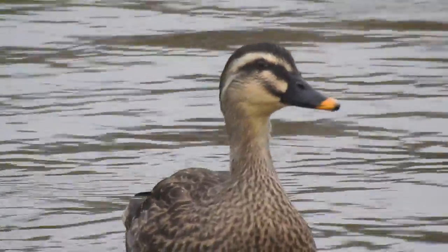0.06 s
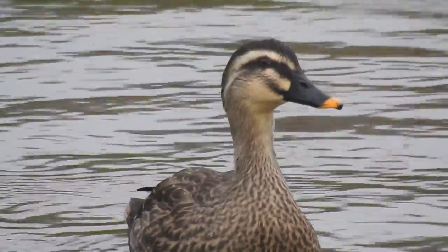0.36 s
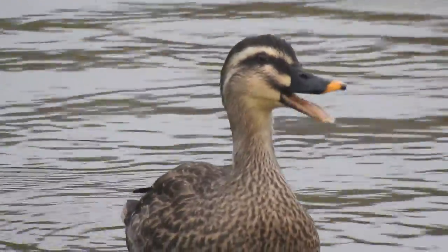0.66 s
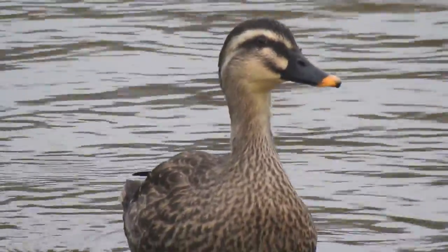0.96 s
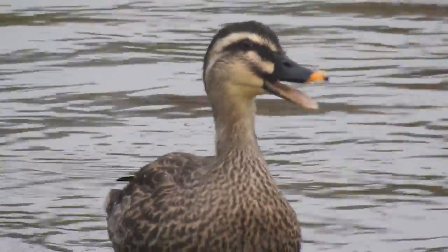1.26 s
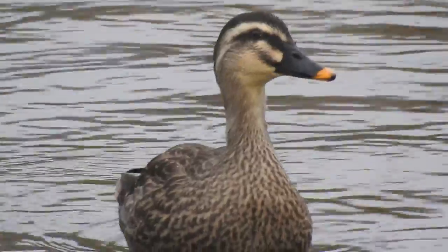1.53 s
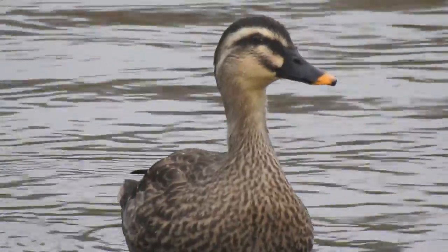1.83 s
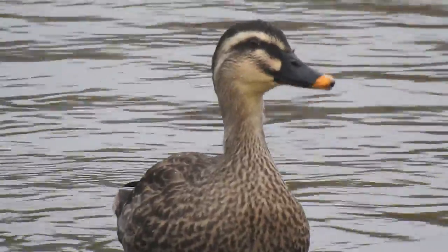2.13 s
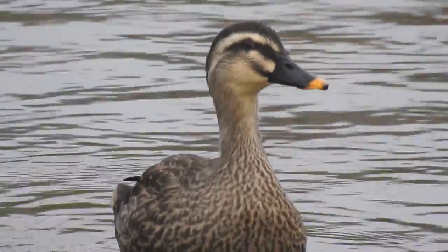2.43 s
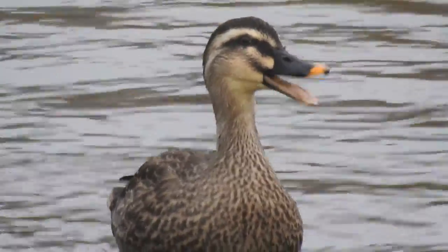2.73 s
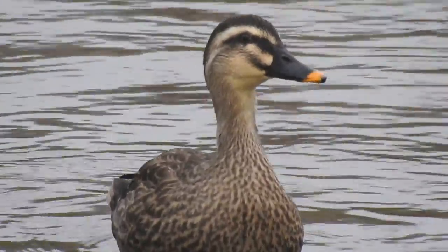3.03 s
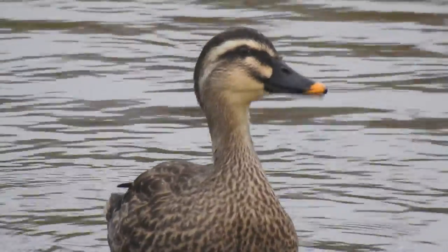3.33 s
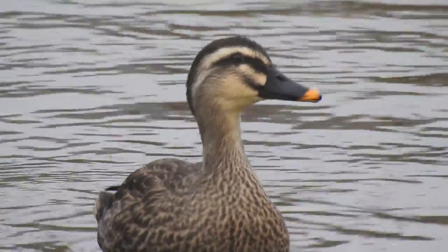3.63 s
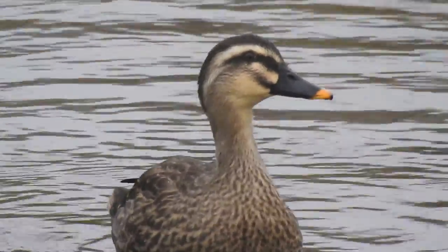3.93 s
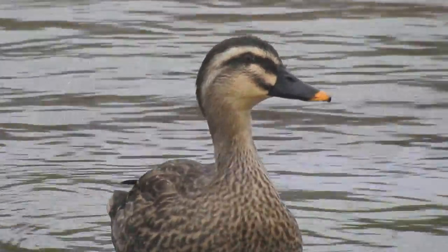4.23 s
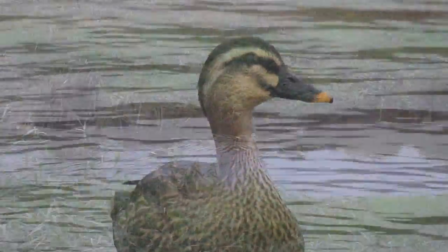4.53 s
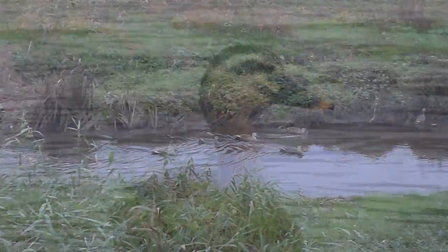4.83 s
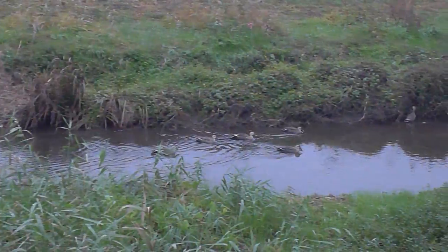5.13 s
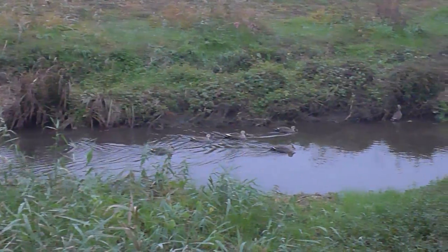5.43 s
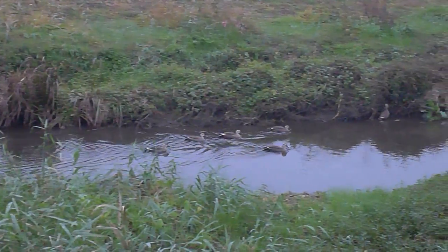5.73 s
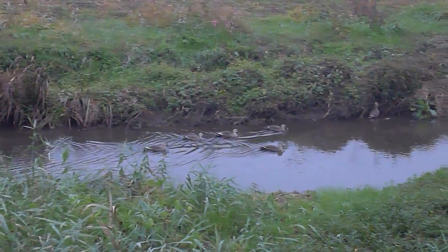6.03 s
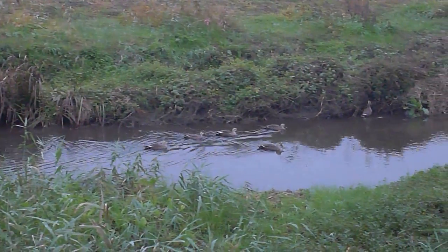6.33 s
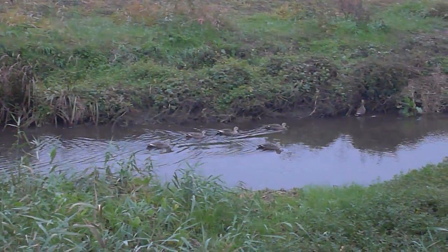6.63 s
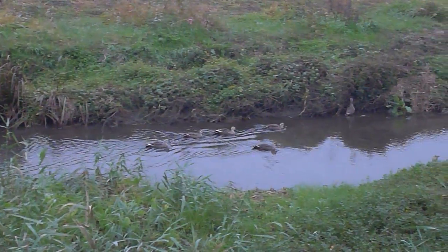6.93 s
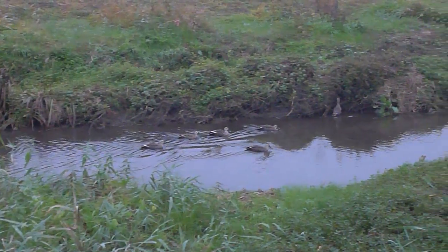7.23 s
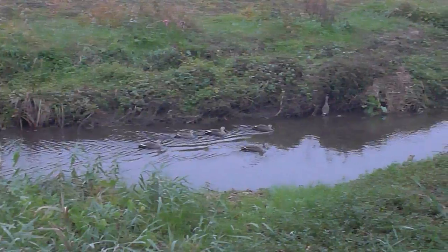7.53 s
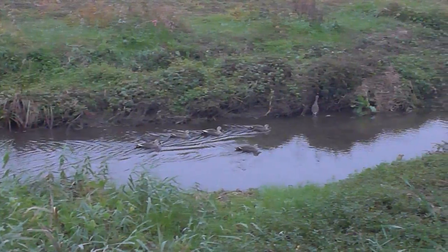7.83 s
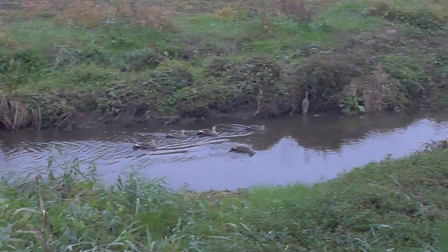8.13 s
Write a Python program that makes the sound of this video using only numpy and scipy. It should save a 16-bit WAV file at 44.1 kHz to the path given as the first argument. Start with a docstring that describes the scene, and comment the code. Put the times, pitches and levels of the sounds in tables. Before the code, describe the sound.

A duck on a river gives six loud, raspy quacks at an even pace, fairly close and straight ahead. Water washes softly over a low distant rumble, while a wagtail adds thin, high chips from the left. After the last quack a few drops fall, and the sound fades to a quieter spot up the bank, with one faint hoot, a small bird's rapid chatter and a far road swelling slightly.

```python
"""Over the wash of a river and a low distant rumble, a duck gives six evenly spaced quacks:
membranes in its voice box slap shut and make its throat and bill ring. Meanwhile a wagtail throws
in thin arched chips, and other birds whistle farther off. After the last quack a few drops fall, and
the scene fades into a quieter, single-channel spot up the bank. There a small bird chatters about
twelve notes a second, something hoots once, and a far road swells."""
import sys
import numpy as np
from scipy import signal
from scipy.fft import rfft, irfft, next_fast_len
from scipy.io import wavfile
from scipy.ndimage import uniform_filter1d

SR = 44100
rng = np.random.default_rng(int(sys.argv[2]) if len(sys.argv) > 2 else 0)


def master_out(mix):
    """Clip the mix to full scale and print it as 16-bit PCM to the path in sys.argv[1]."""
    frames = np.transpose(np.atleast_2d(mix))
    ceiling = np.clip(frames, -1, 1)
    pcm = np.round(ceiling * 32767).astype(np.int16)
    wavfile.write(sys.argv[1], SR, pcm)


N = 360297
TIME = np.arange(N) / SR


def gain_of(db):
    """Turns decibels into a number to multiply a sound by."""
    return 10 ** (np.asarray(db) / 20)


def unit_level(x):
    """Scales a signal so that its average power is 1."""
    return x / np.sqrt(np.mean(np.abs(x) ** 2) + 1e-20)


def at_frequency(points, hz):
    """Reads between the rows of a table, with frequency spaced in octaves."""
    row_hz, value = np.transpose(points)
    return np.interp(np.log(hz + 1), np.log(row_hz + 1), value)


def wander(n, rate_hz):
    """A smooth random wobble that moves up to about rate_hz."""
    size = next_fast_len(n + SR // 10)
    hz = np.fft.rfftfreq(size, 1 / SR)
    return unit_level(irfft(rfft(rng.standard_normal(size)) * np.exp(-(hz / rate_hz) ** 2)))[:n]


def keep_band(x, hz, kind, order=2):
    """Keeps what lies above ("high") or below ("low") hz."""
    return signal.sosfilt(signal.butter(order, hz, kind, fs=SR, output="sos"), x)


def play(source, rows):
    """One track with a sound for each row; anything before time zero is dropped."""
    track = np.zeros(N)
    for row in rows:
        start_s, sound = source(*row)
        start = round(start_s * SR)
        sound = sound[max(-start, 0):]
        part = track[max(start, 0):][:len(sound)]
        part += sound[:len(part)]
    return track


# how alike the left and right noise are: frequency_hz, likeness (1 = the same)
STEREO_LIKENESS = [(60, 0.87), (300, 0.95), (1700, 0.82), (6000, 0.61), (12000, 0.41)]
# how far the left is ahead: frequency_hz, lead_radians
LEFT_LEAD = [(100, 0), (700, 0.04), (1700, 0.28), (6000, 1.3), (12000, 1.35)]
# how much louder the left is: frequency_hz, boost_db
LEFT_BOOST = [(100, 0), (500, -0.5), (1700, 4), (6000, 2), (12000, 0)]

def wash(spectrum, patchy_db):
    """Stereo noise of power about 1, shaped by a spectrum, with drifting louder and softer patches."""
    hz = np.fft.rfftfreq(2048, 1 / SR)
    a, b, c, d, patches = rng.standard_normal((5, len(hz), N // 512 + 5))
    shared, separate = a + 1j * b, c + 1j * d
    patches = unit_level(uniform_filter1d(uniform_filter1d(patches, size=14, axis=0), size=8, axis=1))
    alike = np.clip(at_frequency(STEREO_LIKENESS, hz), -1, 1)[:, None]
    lean = gain_of(at_frequency(LEFT_BOOST, hz) / 2) * np.exp(.5j * at_frequency(LEFT_LEAD, hz))
    left = shared * lean[:, None]
    right = (alike * shared + np.sqrt(1 - alike ** 2) * separate) / lean[:, None]
    shape = gain_of(at_frequency(spectrum, hz)[:, None] + patchy_db * patches)
    noise = signal.istft(np.array([left, right]) * shape, nperseg=2048, noverlap=1536)[1][:, :N]
    return noise / noise.mean(0).std()


# the rumble's tone: frequency_hz, relative_db
RUMBLE_SPECTRUM = [(20, -38), (35, -36), (50, -13.5), (72, 2.5), (105, -11.5), (140, -29), (300, -53)]
# its loudness: time_s, level_db
RUMBLE_LOUDNESS = [(0, -50), (1.1, -53), (1.9, -48.5), (2.45, -59.5), (3, -53), (3.3, -48), (3.9, -48.5),
                   (4.6, -48)]

def rumble():
    """Deep, distant noise that swells and sinks."""
    return gain_of(np.interp(TIME, *np.transpose(RUMBLE_LOUDNESS))) * wash(RUMBLE_SPECTRUM, patchy_db=1.5)


# the drone's tone: frequency_hz, relative_db
DRONE_SPECTRUM = [(80, -38), (140, -14.5), (195, 1.5), (280, 0), (340, -13.5), (450, -11.5), (900, -56)]

def drone(level_db=-50):
    """A steady low noise just above the rumble."""
    return gain_of(level_db) * wash(DRONE_SPECTRUM, patchy_db=3.5)


# the water's tone: frequency_hz, relative_db
RIVER_SPECTRUM = [(190, 0.5), (330, -1.5), (470, -6), (609, -2), (692, -6.5), (1100, -2.5), (1400, -7),
                  (1600, -11), (2140, -9), (2590, -9.5), (4340, -7.5), (5100, -6.5), (6390, -1.5),
                  (8130, -17.5), (15500, -35.5)]

def river(level_db=-47.5):
    """Water washing along the river's edge."""
    return gain_of(level_db) * wash(RIVER_SPECTRUM, patchy_db=2.5)


# the tone of the air up the bank: frequency_hz, relative_db
HUSH_SPECTRUM = [(20, -18.5), (45, 1), (90, 1), (150, -7), (400, -8.5), (900, -14.5), (1300, -13.5),
                 (1800, -11.5), (2400, -16), (4800, -15.5), (5800, -17), (6900, -27), (7700, -42.5),
                 (9000, -70)]

def hush(level_db=-51):
    """The even hush of open air."""
    return gain_of(level_db) * wash(HUSH_SPECTRUM, patchy_db=.3)


# the road's tone: frequency_hz, relative_db
ROAD_SPECTRUM = [(300, -11), (600, -0.5), (700, 5), (790, -1), (920, 6.5), (1130, -0.5), (1400, -7.5),
                 (2500, -54.5)]
# its swell: time_s, relative_db
ROAD_SWELL = [(5, -55), (5.4, -51), (6.2, -52), (6.8, -49), (7.35, -46), (7.7, -50), (8.17, -51)]

def road(trim_db=-4):
    """The noise of a far road grows, then eases."""
    level_db = np.interp(TIME, *np.transpose(ROAD_SWELL)) + trim_db
    return gain_of(level_db) * wash(ROAD_SPECTRUM, patchy_db=.5)


def bank_echo(x, decay_s, echo_db):
    """Reeds and banks scatter a faint tail, different on each side, that falls 60 dB in decay_s."""
    t = np.arange(SR // 2) / SR
    echoes = rng.standard_normal((2, len(t))) * (rng.random((2, len(t))) < .05)
    echoes *= gain_of(-60 * t / decay_s) * (t > .004)
    echoes /= np.linalg.norm(echoes[0])
    return gain_of(echo_db) * signal.fftconvolve(x[None], echoes, axes=1)[:, :N]


def ripple_echo(x, echo_db=-6.5):
    """Rippled water scatters the treble within a few milliseconds, differently to each side."""
    t = np.arange(SR // 80) / SR
    echoes = rng.standard_normal((2, len(t))) * np.exp(-t / .003)
    echoes /= np.linalg.norm(echoes, axis=1, keepdims=True)
    treble = keep_band(x, 4200, "high")
    return gain_of(echo_db) * signal.fftconvolve(treble[None], echoes, axes=1)[:, :N]


def with_close_echo(x, echo_db=-16, delay_s=.00138):
    """A surface beside the microphone adds one quick echo that colours the sound."""
    return x + gain_of(echo_db) * np.roll(x, round(delay_s * SR), axis=-1)


# a faint low hoot: start_s, level_db, lowest_hz, length_s
HOOTS = [(4.85, -45.5, 192.8, 0.17)]

def hoot(start_s, level_db, lowest_hz, length_s, sag=.14):
    """A soft, plain tone that sags and rises again."""
    along = np.linspace(-1, 1, int(length_s * SR))
    tone = np.sin(2 * np.pi * np.cumsum(lowest_hz * (1 + sag * along ** 2)) / SR)
    return start_s, gain_of(level_db) * tone * signal.windows.tukey(len(along), .4)


# drops and plops on the water: start_s, level_db, pitch_hz
WATER_DROPS = [(4.047, -28, 8930), (4.082, -48, 8850), (4.565, -45, 622)]

def drip(start_s, level_db, pitch_hz, tick_db=-15):
    """A tick and a ringing bubble; large bubbles ring lower and longer."""
    t = np.arange(SR // 8) / SR
    tick = gain_of(tick_db) * rng.standard_normal(len(t)) * np.exp(-t / .00052)
    ring_s = 3.4 / np.sqrt(pitch_hz)
    bubble = np.sin(2 * np.pi * pitch_hz * t) * gain_of(-60 * t / ring_s)
    return start_s, gain_of(level_db) * (tick + bubble)


# birds farther off: start_s, level_db, first_hz, last_hz, length_s
FAR_WHISTLES = [(1.776, -62, 9700, 8360, 0.27), (1.965, -51, 5020, 3020, 0.057),
                (2.194, -50, 3670, 3660, 0.17), (3.94, -45.5, 5270, 5280, .025),
                (3.959, -45, 4730, 4420, 0.026), (3.987, -46.5, 3700, 4320, 0.02),
                (4.016, -51.5, 2490, 2830, 0.015)]

def whistle(start_s, level_db, first_hz, last_hz, length_s, waver=.03, flicker_db=4):
    """A thin, ragged whistle that slides from one pitch to another."""
    n = int(length_s * SR)
    hz = np.linspace(first_hz, last_hz, n) * (1 + waver * wander(n, 400))
    tone = np.sin(2 * np.pi * np.cumsum(hz) / SR) * gain_of(flicker_db * wander(n, 120))
    return start_s, gain_of(level_db) * unit_level(tone * signal.windows.tukey(n, .6))


# tumbling bird phrases: start_s, length_s, level_db, first_hz, last_hz
WARBLE_PHRASES = [(0.199, .2, -58.5, 4470, 3200), (2.259, 0.084, -52.5, 3120, 2550)]

def warble(start_s, length_s, level_db, first_hz, last_hz, scatter=.15, note_s=.023, notes_per_s=71):
    """Tiny whistles tumble loosely down from the first pitch to the last."""
    along = np.linspace(0, 1, round(length_s * notes_per_s))
    starts_s = start_s + length_s * along - note_s / 2
    path_hz = first_hz + (last_hz - first_hz) * along
    ends_hz = path_hz[:, None] * (1 + scatter * rng.standard_normal((len(along), 2)))
    return play(whistle, [(s, level_db, *hz, note_s) for s, hz in zip(starts_s, ends_hz)])


# plain low pips among the chatter: start_s, level_db, pitch_hz
LOW_PIPS = [(5.02, -61.5, 3360), (6.298, -51, 3350), (7.666, -54, 3300)]

def pip(start_s, level_db, pitch_hz, rise=.043, length_s=.024):
    """A short whistle that rises slightly."""
    return whistle(start_s, level_db, pitch_hz * (1 - rise), pitch_hz * (1 + rise), length_s)


# the tones stacked in a chatter note: multiple_of_base_pitch, relative_db
CHATTER_TONES = [(2, -1.5), (3, 7.5), (4, -9.5)]
# how the voice changes: time_s, strongest_tone_hz, lowest_tone_boost_db
CHATTER_VOICE = [(4.6, 4755, -4), (6.3, 4910, -0.5), (6.4, 5195, 6), (6.9, 5130, -1), (7.3, 4960, -0.5),
                 (7.7, 4960, 6)]
# its loudness, which falters twice: time_s, level_db
CHATTER_LOUDNESS = [(4.63, -56), (5.12, -46.5), (5.8, -48), (6.22, -44), (6.3, -51.5), (6.37, -45.5),
                    (6.85, -45), (7.43, -47.3), (7.55, -54.5), (7.67, -50.5), (8.1, -47.5)]

def chatter_note(start_s, length_s=.03, sweeps_per_s=150, arch=.097, drop=.34, scratch=.055):
    """A buzzy note: four or five quick downward sweeps riding on a small arch."""
    n = int(length_s * SR)
    t = np.arange(n) / SR
    times_s, *columns = np.transpose(CHATTER_VOICE)
    strongest_hz, boost_db = (np.interp(start_s, times_s, column) for column in columns)
    level_db = np.interp(start_s, *np.transpose(CHATTER_LOUDNESS)) + .16 * rng.standard_normal()
    sweep = sweeps_per_s * (1 + .09 * rng.standard_normal()) * t % 1
    fall = drop * (.5 - sweep) + scratch * wander(n, 1000) + .015 * rng.standard_normal()
    hz = strongest_hz * (1 + fall + arch * (np.sin(np.pi * t / length_s) - 2 / np.pi))
    base_cycles = np.cumsum(hz) / SR / 3  # the strongest tone is 3 times the base pitch
    note = np.zeros(n)
    for multiple, db in CHATTER_TONES:
        tone_db = db + boost_db * (multiple == 2) + 1.3 * wander(n, 220)
        note += gain_of(tone_db) * np.sin(2 * np.pi * multiple * base_cycles)
    fades = np.sqrt(np.sin(np.pi * sweep)) * signal.windows.tukey(n, .25)
    return start_s, gain_of(level_db) * unit_level(note * fades)


# runs of chatter: first_note_s, last_note_s, note_count
NOTE_RUNS = [(4.627, 6.148, 19), (6.222, 6.529, 5), (6.616, 7.426, 11), (7.508, 7.903, 6),
             (7.998, 8.155, 3)]

def chatter():
    """A small bird sings run after run, each at its own even pace, with a few pips among them."""
    notes = [(s,) for first_s, last_s, count in NOTE_RUNS for s in np.linspace(first_s, last_s, count)]
    return play(chatter_note, notes) + play(pip, LOW_PIPS)


# the wagtail's calls: middle_s, level_db, top_hz, length_s
WAGTAIL_CHIPS = [(0.518, -47, 6200, 0.027), (0.892, -31.5, 6250, 0.046), (0.991, -32, 6060, 0.05),
                 (1.682, -37.5, 5880, 0.01), (1.955, -31, 6250, 0.047), (2.044, -32, 6080, 0.051),
                 (3.382, -35, 6330, 0.041), (3.472, -36, 5850, 0.033), (4.32, -38, 6370, 0.046),
                 (4.406, -41.5, 6200, 0.056), (4.51, -40, 6000, 0.057)]

def chip(middle_s, level_db, top_hz, length_s, arch=.27, fall=.051, buzz_hz=720, buzz=.38):
    """A whistle that arches up and falls further, made buzzy by a fast flutter."""
    n = int(length_s * SR)
    along = np.linspace(-1, 1, n)
    hz = top_hz * (1 - arch * along ** 2 - fall * along + .025 * wander(n, 350))
    flutter = np.sin(2 * np.pi * np.cumsum(buzz_hz * (1 + .112 * wander(n, 220))) / SR)
    tone = np.sin(2 * np.pi * np.cumsum(hz) / SR + buzz * flutter) * (1 + buzz * flutter)
    return middle_s - length_s / 2, gain_of(level_db) * unit_level(tone) * signal.windows.tukey(n, .8)


def resonate(x, hz, width_hz):
    """Rings like a hollow space: keeps a narrow band around hz, which may move over time."""
    spin = np.exp(2j * np.pi * np.cumsum(hz * np.ones(len(x))) / SR)
    decay = np.exp(-np.pi * width_hz / SR)
    band = signal.lfilter([(1 - decay) ** 2], [1, -2 * decay, decay ** 2], x / spin + 1e-18)
    return 2 * (spin * band).real


def steadied(x, samples):
    """Evens out the loudness over a stretch of samples."""
    return x / np.sqrt(abs(uniform_filter1d(x ** 2, samples)) + np.mean(x ** 2) / 20)


def unevenness(n, depth_db):
    """A strength that changes from slap to slap, within limits."""
    return gain_of(1.5 * depth_db * np.tanh(wander(n, 220)))


# the bright edge of each slap in the duck's voice: frequency_hz, gain_db
RASP_SPECTRUM = [(2000, -40), (3400, -20), (4100, -21), (4850, -10), (5450, -7), (5850, -2.5), (6300, -1.5),
                 (6650, 0), (7000, -4.5), (7350, -16), (7650, -11), (8000, -24), (9200, -40), (14000, -60)]

def rasp_ring(slaps, size=2048):
    """Gives each slap a sharp start and a short, bright ring."""
    log_gain = np.log(gain_of(at_frequency(RASP_SPECTRUM, abs(np.fft.fftfreq(size, 1 / SR)))))
    ring = np.fft.ifft(np.exp(np.conj(signal.hilbert(log_gain)))).real  # packs the energy at the start
    return signal.fftconvolve(slaps, ring[:size // 2])[:len(slaps)]


# side rings of windpipe and throat, with the bill open: frequency_hz, width_hz, gain_db
THROAT_RINGS = [(689, 87, -11), (1160, 127, -7.5), (1432, 100, -13), (2205, 166, -13.5)]

def throat(drive, bill_hz, open_hz=1740, main_width_hz=322):
    """As the bill opens, every ring rises in pitch and the side ones grow louder: a 'wah'."""
    opening = bill_hz / open_hz
    # rings above the main one swing against it, so their sign flips
    sides = sum(np.sign(open_hz - hz) * gain_of(db) * resonate(drive, hz * opening, width_hz)
                for hz, width_hz, db in THROAT_RINGS)
    return resonate(drive, bill_hz, main_width_hz) + gain_of(80 * (opening - 1)) * sides


def to_go(t, length_s):
    """Falls from 1 to 0 over length_s."""
    return np.clip(1 - t / length_s, 0, 1)


def quack_shape(t, length_s, attack_s=.032, swell_s=.15, release_s=.033, peak_s=.18):
    """A quack catches, swells and is cut off, while its pitch arches and the bill moves."""
    release = to_go(length_s - t, release_s) ** 2
    effort_db = -12.5 * to_go(t, attack_s) - 8 * to_go(t, swell_s) - 16 * release
    rasp_shape_db = 3.5 * release - 10.5 * to_go(t, .088)  # comes in late and lingers a little
    pitch_share = 1 - .125 * (t / peak_s - 1) ** 2
    snap_open = (1 + np.tanh((t - .046) / .017)) / 2
    slow_close = .088 * np.maximum(t - peak_s / 2, 0)
    bill_share = .935 + .065 * snap_open - slow_close
    return effort_db, rasp_shape_db, pitch_share, bill_share


# the quacks, the first already under way: start_s, level_db, rasp_vs_voice_db, top_hz, open_bill_hz
DUCK_QUACKS = [(-0.151, -32.5, -3, 263.7, 1766), (0.585, -32.5, -3.2, 265, 1730),
               (1.304, -32.5, -3.5, 263.4, 1734), (2.006, -31, -2.9, 262.6, 1740),
               (2.752, -31, -1.8, 268.7, 1756), (3.451, -30, -6, 279.6, 1780)]

def quack(start_s, level_db, rasp_db, top_hz, open_bill_hz, length_s=.245, air=.46, rasp_air=.73,
          hum_db=-12.5, full_effort_db=-30.5):
    """Membranes in the duck's voice box slap shut unevenly and make the throat and bill ring."""
    t = np.arange(0, length_s, 1 / SR)
    n = len(t)
    effort_db, rasp_shape_db, pitch_share, bill_share = quack_shape(t, length_s)
    hz = top_hz * pitch_share
    cycles = np.cumsum(hz * (1 + .007 * wander(n, 40))) / SR
    # a slower membrane, at a third of the pitch, makes the slaps strong and weak, early and late
    slow_phase = 2 * np.pi * (cycles / 3 + .074 * wander(n, 25) + rng.random())
    shift_ms = .095 * wander(n, 200) + .16 * np.sin(slow_phase)
    uneven_cycles = cycles + hz * shift_ms / 1000
    strength = (1 + .24 * np.cos(slow_phase)) * unevenness(n, depth_db=1)
    slap_count = np.maximum.accumulate(np.maximum(uneven_cycles, 0)).astype(int)
    slaps = unit_level(np.diff(slap_count, prepend=0).astype(float))
    puffs = unit_level(np.exp(-(uneven_cycles % 1) / .28) * rng.standard_normal(n))
    drive = strength * (slaps + air * puffs)
    # a bright ring grows with the rasp and is stronger in the louder quacks
    bright_db = -15.5 + rasp_shape_db + level_db - full_effort_db
    bright = gain_of(bright_db) * resonate(drive, hz=2530 * bill_share, width_hz=340)
    voice = steadied(throat(drive, open_bill_hz * bill_share) + bright, samples=1300)
    rasp_drive = np.sqrt(abs(strength)) * unevenness(n, depth_db=4) * (slaps + rasp_air * puffs)
    rasp = gain_of(rasp_db + rasp_shape_db) * steadied(rasp_ring(rasp_drive), samples=700)
    hum = gain_of(hum_db) * unit_level(np.sin(2 * np.pi * cycles) * strength)
    return start_s, gain_of(level_db + effort_db) * (voice + rasp + hum) * signal.windows.tukey(n, .05)


def from_the_left(x, lead_ms=.05, louder_db=2.7):
    """A sound from the left reaches the left microphone earlier and louder."""
    half_lead = np.exp(1j * np.pi * np.fft.rfftfreq(N, 1 / SR) * lead_ms / 1000)
    lean = half_lead * gain_of(louder_db / 2)
    return np.array([irfft(rfft(x) * lean ** side, N) for side in (1, -1)])


def waterside():
    """The duck ahead, small birds and drips to the left, water and rumble all round."""
    duck = play(quack, DUCK_QUACKS)
    small_sounds = play(chip, WAGTAIL_CHIPS) + play(whistle, FAR_WHISTLES)
    small_sounds += sum(warble(*row) for row in WARBLE_PHRASES) + play(drip, WATER_DROPS)
    background = river() + rumble() + drone()
    duck = duck + ripple_echo(duck) + bank_echo(duck, decay_s=.47, echo_db=-16)
    duck *= gain_of([[.2], [-.2]])  # a touch louder on the left
    small_sounds = from_the_left(small_sounds) + bank_echo(small_sounds, decay_s=.27, echo_db=-11)
    return with_close_echo(duck + background) + small_sounds


def up_the_bank(fade_in):
    """The chattering bird, dulled by distance, as hush and road fade in; all in one channel."""
    bird = keep_band(chatter(), 6800, "low", order=8)
    bird += ripple_echo(bird).mean(0)
    far_road = road()
    echo = bank_echo(bird, decay_s=.21, echo_db=-5.5)
    return bird + (echo + fade_in * (far_road + hush())).mean(0)


def scene(fade_start_s=4.11, fade_end_s=5.146):
    """The waterside fades into the spot up the bank."""
    fade_in = np.clip((TIME - fade_start_s) / (fade_end_s - fade_start_s), 0, 1)
    return (1 - fade_in) * waterside() + up_the_bank(fade_in) + play(hoot, HOOTS)


def record(dry, lowest_hz=42, highest_hz=15500):
    """Trims away the deepest bass and the highest treble."""
    thinned = keep_band(dry, lowest_hz, "high", order=4)
    treble_cut = signal.firwin(511, highest_hz, window=("kaiser", 9), fs=SR)
    return signal.oaconvolve(thinned, treble_cut[None], "same")


dry = scene()
out = record(dry)
master_out(out)
```